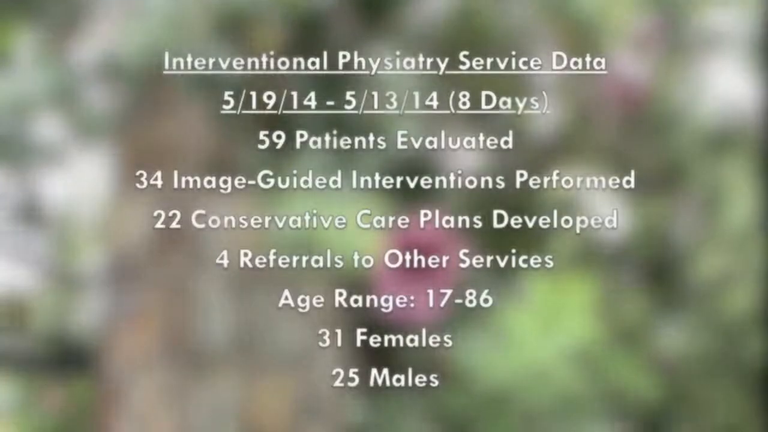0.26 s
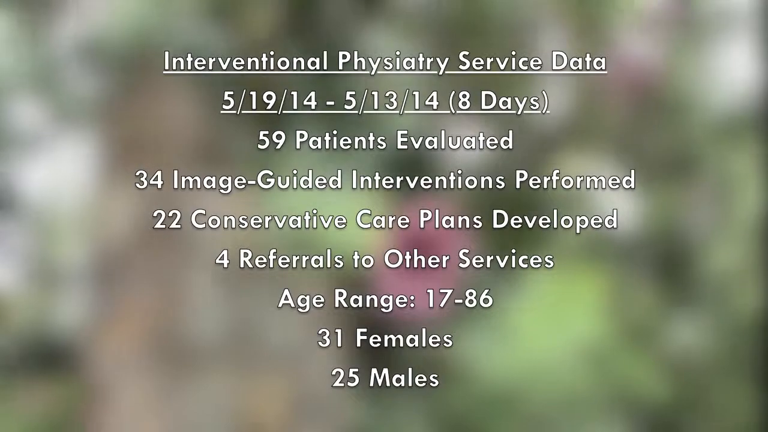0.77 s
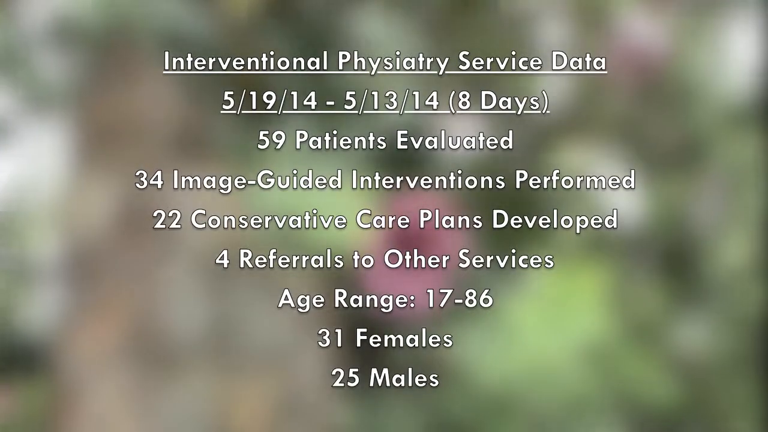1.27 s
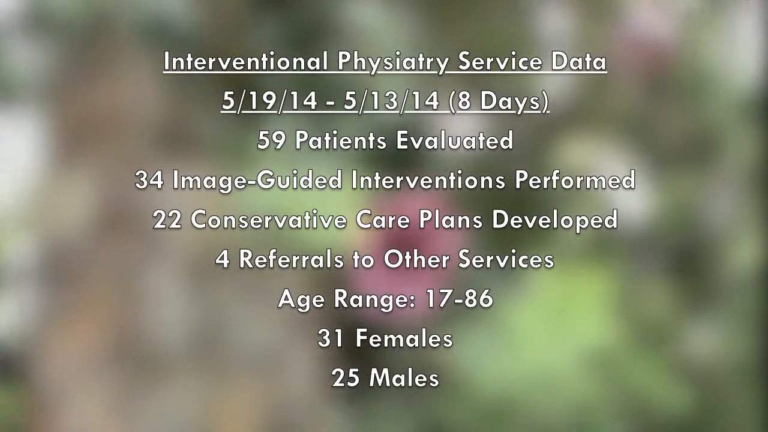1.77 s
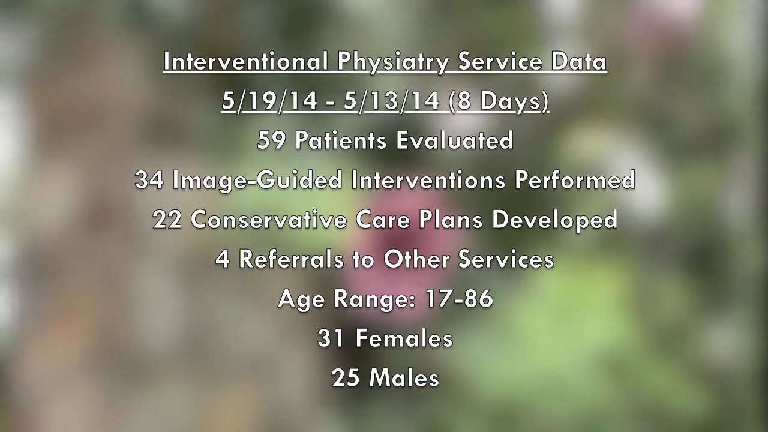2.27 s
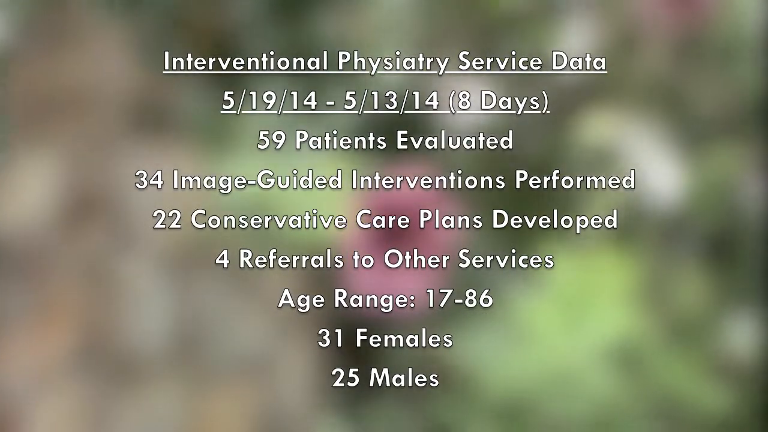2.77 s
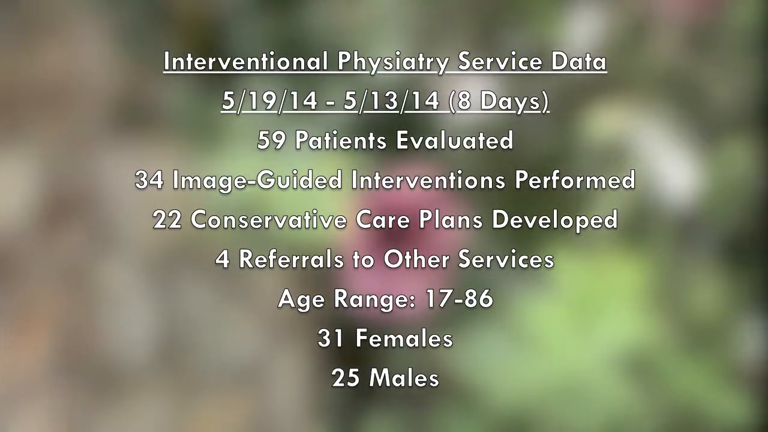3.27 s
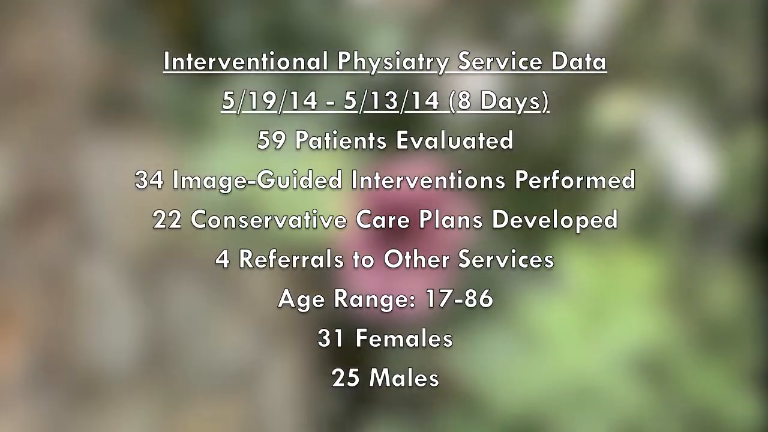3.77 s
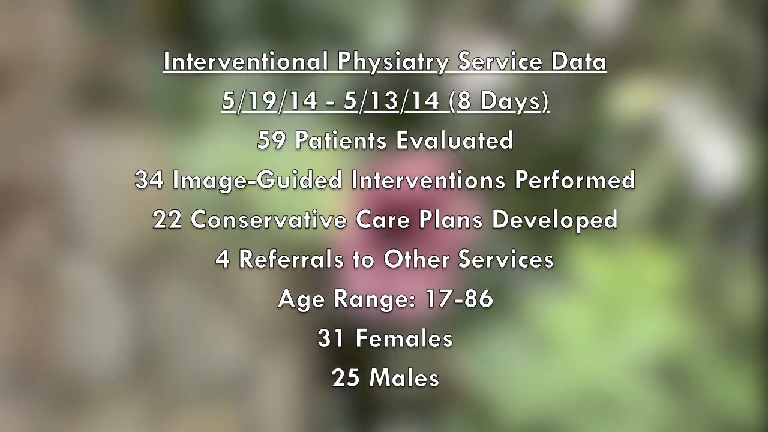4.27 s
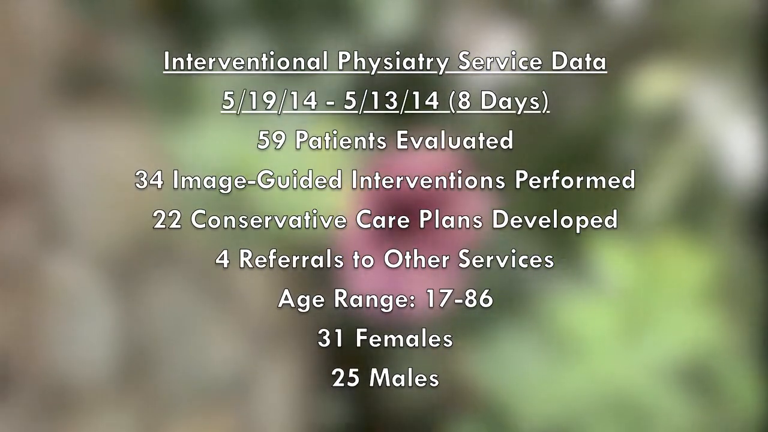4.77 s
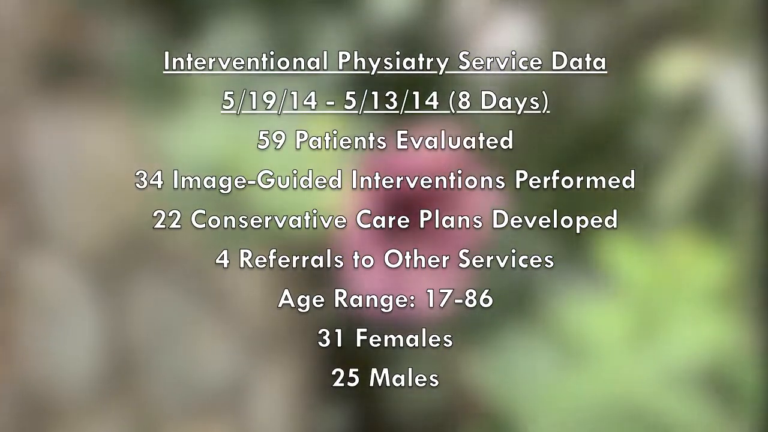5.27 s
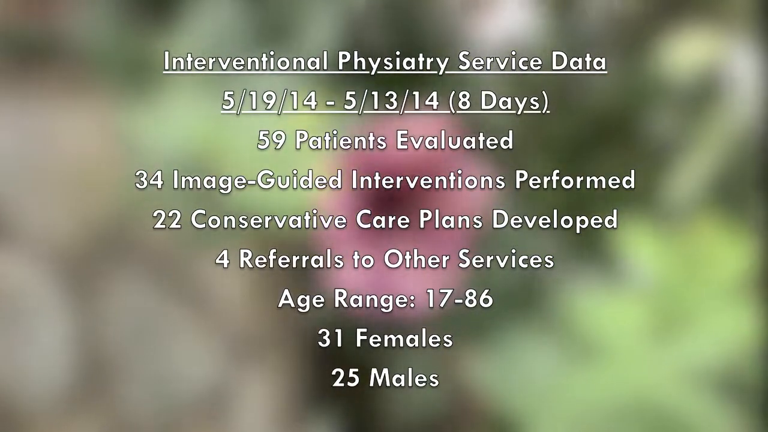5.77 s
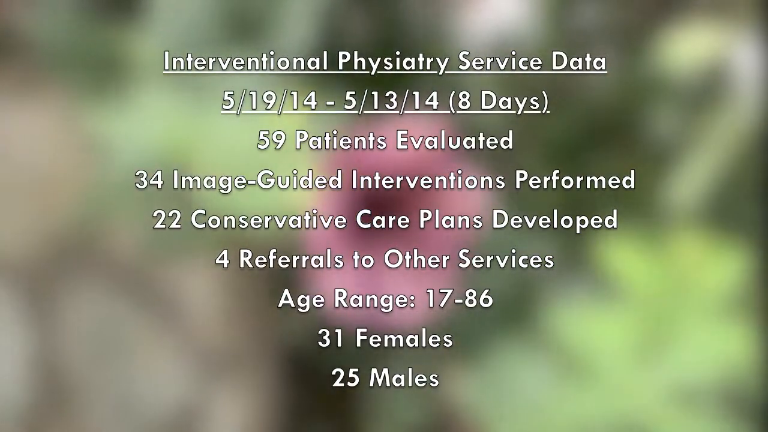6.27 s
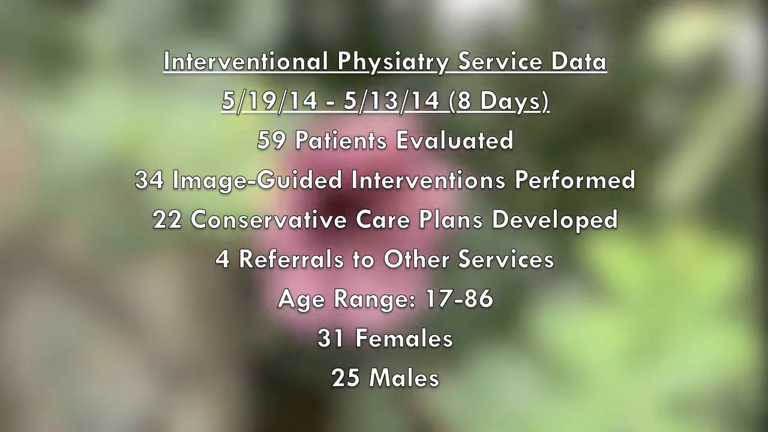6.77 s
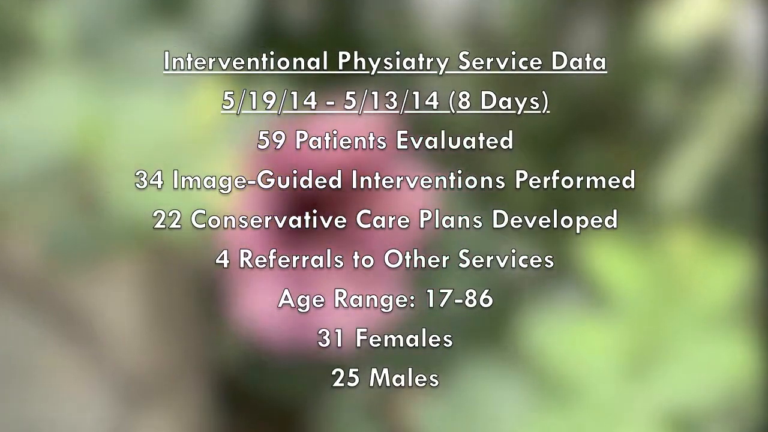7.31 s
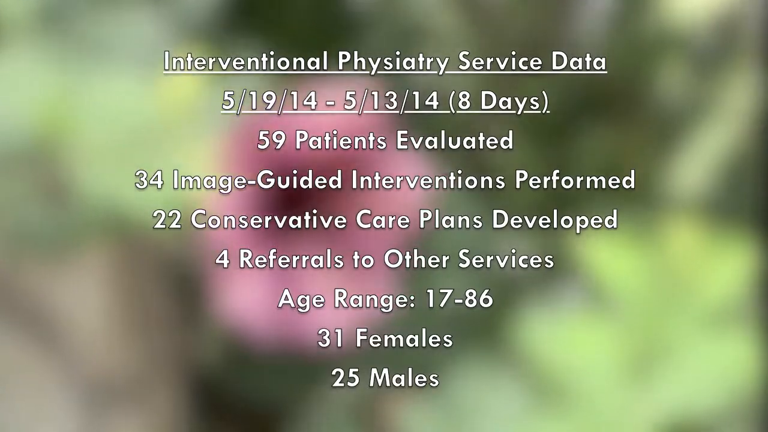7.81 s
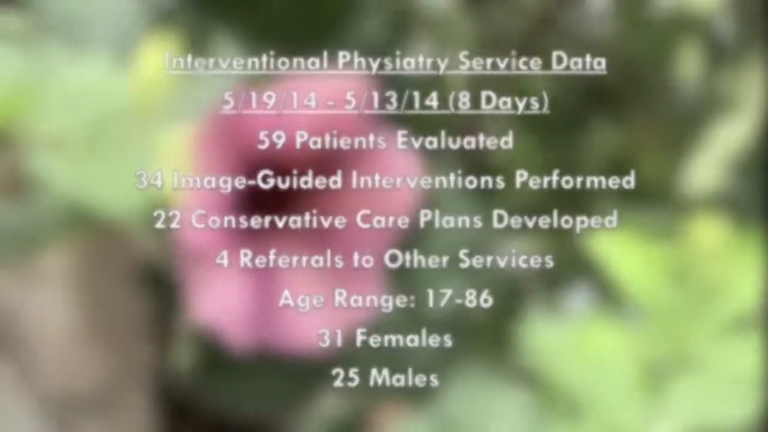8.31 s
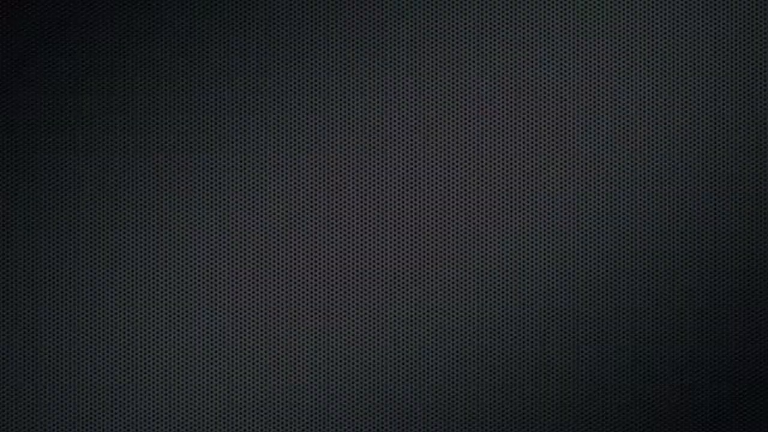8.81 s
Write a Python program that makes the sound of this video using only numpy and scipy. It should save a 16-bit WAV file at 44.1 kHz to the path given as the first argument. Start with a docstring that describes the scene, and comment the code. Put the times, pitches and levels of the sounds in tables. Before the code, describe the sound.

Continuous insect hiss, strongest around five to nine kilohertz, leans slightly left in a wide outdoor stereo field. Over it runs an even, high cricket tone in short rising double pulses with a leafy tail. Far traffic-like murmur and faint microphone hiss stay low. Occasional brushing crackles and tiny taps sound close by, then two sharp clicks, a third just at the end, and sudden silence.

```python
"""A far chorus of cicadas fuses dense tymbal clicks into a bright hiss in a summer garden; a katydid's rasp
throbs in its top band. Cricket chirps of mostly two main rising pulses, with fainter pulses around them, ring
on among the leaves. A dull outdoor murmur and a thin amplifier hiss are coloured noise. Close by are brief
crackling rustles, taps of a few cycles and three dry clicks that snap, then ring; a quick fade ends it."""
import sys
import numpy as np
from scipy import signal
from scipy.fft import rfft, irfft
from scipy.io import wavfile
from scipy.ndimage import uniform_filter1d

SR = 44100
rng = np.random.default_rng(int(sys.argv[2]) if len(sys.argv) > 2 else 0)


def put_to_file(sound):
    """Save the sound as 16-bit audio at rate SR, in the file named by the first command-line argument."""
    columns = np.atleast_2d(sound).T  # one column per channel
    safe = np.clip(columns, -1, 1)
    whole_steps = np.round(safe * 32767)
    wavfile.write(sys.argv[1], SR, whole_steps.astype(np.int16))


N = 399105
TIME = np.arange(N) / SR
FREQ = np.maximum(np.arange(N // 2 + 1) * SR / N, 1)


def undb(db):
    """Gain of a dB value."""
    return 10 ** (np.asarray(db) / 20)


def level(x, rms_db):
    """Scale to an rms level."""
    return x * undb(rms_db) / np.sqrt(np.mean(x ** 2))


def along_hz(table):
    """Columns of a (Hz, ..) table at every frequency bin, interpolated over log frequency."""
    hz, *columns = np.transpose(table)
    return [np.interp(np.log(FREQ), np.log(hz), c) for c in columns]


def split_bands(centres_hz):
    """Power weights of neighbouring bands that crossfade over log frequency and sum to one."""
    return [np.interp(np.log(FREQ), np.log(centres_hz), row) for row in np.eye(len(centres_hz))]


def walk(rate_hz):
    """Random levels, each held 1 / rate_hz, smoothed by two moving means; spread near 1."""
    hold = int(SR / rate_hz)
    steps = np.repeat(rng.standard_normal(N // hold + 1), hold)
    return 1.52 * uniform_filter1d(uniform_filter1d(steps, hold), hold)[:N]


def crowd(share, scatter_db, size=N):
    """Three unrelated streams of clicks; share = part of the samples that hold one."""
    hit = rng.random((3, size)) < share
    strength = undb(scatter_db * rng.standard_normal((3, size)))
    return hit * rng.standard_normal((3, size)) * strength


def spread(streams, gain, place):
    """Colour three streams and place them: one feeds both channels, the others one each."""
    pan_db, lead_rad, likeness = along_hz(place)
    both, left, right = rfft(streams)
    turn = np.exp(.5j * lead_rad)
    shared, own = np.sqrt(likeness) * both, np.sqrt(1 - likeness)
    pair = np.array([(shared * turn + own * left) * undb(pan_db / 2),
                     (shared / turn + own * right) / undb(pan_db / 2)])
    return irfft(pair * gain, N)


def add(out, start_s, sound, pan_db):
    """Mix a short sound in at start_s; pan_db = left minus right."""
    i = int(start_s * SR)
    out[:, i:i + sound.shape[-1]] += sound * undb(np.array([[pan_db], [-pan_db]]) / 2)


# Chorus spectrum. Each row: frequency in Hz, relative density in dB per Hz.
CHORUS_SPECTRUM = [(3300, -37), (4110, -20), (4610, -7.5), (4950, -0.5), (5220, -1.5), (5600, -6),
                   (6000, -1.5), (6400, 0), (7050, -3), (7300, -2), (7850, -4.5), (8600, -1.5),
                   (9100, -6.5), (9700, -14.5), (10250, -45.5), (10800, -78.5)]
# Chorus swell. Each row: time in seconds, rms level in dB.
CHORUS_SWELL = [(0.0, -36.5), (0.65, -35), (7.39, -35), (7.75, -35), (8.7, -35)]
# Stereo place of chorus and katydid. Each row: frequency in Hz, left minus right in dB,
# phase lead of left in radians, likeness of the channels 0-1.
CHORUS_PLACE = [(4000, -2, 0.35, 0.6), (5100, -2.5, .3, 0.89), (6500, -2, .12, 0.94),
                (8000, -1.5, -.04, 0.89), (10200, 0.5, -.04, 0.97)]


def cicadas():
    """Dense tymbal clicks fuse into noise; each species' band wavers a little by itself."""
    colour, out = undb(along_hz(CHORUS_SPECTRUM)[0]), 0
    for band in split_bands([4800, 6400, 8600]):
        waver = undb(.5 * walk(3.545) + 0.34 * walk(25))
        clicks = crowd(.7, 0.83)
        out = out + waver * spread(clicks, colour * np.sqrt(band), CHORUS_PLACE)
    return level(out, 0) * undb(np.interp(TIME, *np.transpose(CHORUS_SWELL)))


# Katydid hesitations, the beat's phase stands still. Each row: start in seconds, length in seconds.
KATYDID_PAUSES = [(2.0, .032), (7.0, .036)]
KATYDID_HZ, KATYDID_SIGMA_HZ, KATYDID_RMS_DB, KATYDID_BEAT_HZ = 8600, 300, -47.5, 11.9
MIRROR_HZ, MIRROR_HALF_WIDTH_HZ, MIRROR_OVER_RASP_DB = 8735, 30, 7


def katydid():
    """A rasp over file teeth, swelling once per wing beat; the wing mirror rings inside its band."""
    paused_s = sum(np.clip(TIME - s, 0, length_s) for s, length_s in KATYDID_PAUSES)
    phase = KATYDID_BEAT_HZ * (TIME - paused_s) % 1
    throb = np.exp(-phase / 0.68) * np.minimum(phase / 0.12, 1)
    rasp = np.exp(-.5 * ((FREQ - KATYDID_HZ) / KATYDID_SIGMA_HZ) ** 2)
    detune = (FREQ - MIRROR_HZ) / MIRROR_HALF_WIDTH_HZ
    mirror = undb(MIRROR_OVER_RASP_DB) / (1 + detune ** 2)
    teeth = throb * crowd(.7, .8)
    return level(spread(teeth, rasp * (1 + mirror), CHORUS_PLACE), KATYDID_RMS_DB)


# Murmur spectrum. Each row: frequency in Hz, relative density in dB per Hz.
MURMUR_SPECTRUM = [(22, -17), (52, -11), (66, -1), (81, -10.5), (96, -3), (115, -8), (178, -8.5),
                   (400, -6.5), (971, -7.5), (1500, -10.5), (2500, -11.5), (4200, -13.5), (6000, -59.5)]
# Stereo place of the murmur. Each row: frequency in Hz, left minus right in dB,
# phase lead of left in radians, likeness of the channels 0-1.
MURMUR_PLACE = [(50, .2, 0.18, 0.98), (100, .4, 0.049, 1), (150, 0.5, 0.18, 0.78), (402, 0.2, 0.72, 0.37),
                (1200, 0.2, 1, 0.2), (2100, 0, 0.57, 0.38), (3300, -.7, 0.79, .65)]
# Low drones. Each row: time in seconds, relative level near 66 Hz in dB, relative level near 97 Hz in dB.
DRONE_LEVELS = [(0, 0, 6), (.25, 2.5, 2.5), (.5, 0.5, 4), (.8, -4, -4.5), (1.1, 6, -0.5), (1.5, -2.5, -2.5),
                (2.3, 3, -1.5), (2.8, -1.5, -3.5), (3.3, -1.5, 1), (3.8, -3.5, -3), (4.2, 4, -4), (5, 0, 2),
                (5.9, 2, -2.5), (6.5, -3, -1), (7.05, 2.5, 5), (7.3, 0.5, 1), (7.65, -2.5, 6.5),
                (8.1, 0.5, 0), (8.5, 1, 3.5), (8.7, -0.5, -2.5)]
MURMUR_RMS_DB = -53.5


def murmur():
    """Far traffic and stirring leaves as noise; two low drones, middle and top swell on their own."""
    colour, out = undb(along_hz(MURMUR_SPECTRUM)[0]), 0
    drone_s, *drones_db = np.transpose(DRONE_LEVELS)
    for k, band in enumerate(split_bands([66, 97, 150, 400, 1800])):
        swell_db = 0.35 * walk(1.5) + 0.89 * walk(7)
        if k < 2:
            swell_db = swell_db + np.interp(TIME, drone_s, drones_db[k])
        grains = crowd(.2, 2.27)
        out = out + undb(swell_db) * spread(grains, colour * np.sqrt(band), MURMUR_PLACE)
    return level(out, MURMUR_RMS_DB)


# Amplifier hiss spectrum. Each row: frequency in Hz, relative density in dB per Hz.
HISS_SPECTRUM = [(10500, -35), (12000, -15.5), (13100, 4), (14900, 7), (15700, 6.5)]
HISS_RMS_DB = -62  # ahead of fade and top cut


def hiss():
    """Amplifier noise above 9 kHz, the same in both channels, flickering."""
    gain = undb(along_hz(HISS_SPECTRUM)[0]) * (FREQ > 9000)
    noise = irfft(rfft(rng.standard_normal(N)) * gain, N)
    return level(noise * undb(1.1 * walk(12.0)), HISS_RMS_DB)


# Cricket chirps. Each row: nominal time of the middle pulse in seconds, its mid pitch in Hz,
# levels in dB at five successive pulse slots (the outer ones often faint),
# tail level in dB ahead of the echo shares.
CHIRPS = [(0.093, 2905, -70, -54, -50, -57, -70, -59), (0.167, 2889, -70, -52, -46, -58, -70, -60),
          (0.27, 2894, -70, -58, -45, -61, -70, -58), (0.374, 2898, -59, -53, -49, -54, -59, -57),
          (0.498, 2894, -70, -50, -45, -55, -70, -57), (0.584, 2890, -58, -54, -42, -55, -60, -57),
          (0.679, 2896, -57, -50, -48, -56, -70, -57), (0.76, 2898, -54, -51, -41, -60, -59, -57),
          (0.856, 2902, -56, -48, -47, -61, -59, -57), (0.978, 2903, -57, -50, -47, -53, -60, -60),
          (1.126, 2894, -70, -49, -46, -61, -70, -59), (1.241, 2905, -55, -52, -46, -58, -63, -59),
          (1.398, 2892, -63, -51, -49, -56, -61, -58), (1.489, 2888, -70, -50, -44, -61, -63, -57),
          (1.584, 2895, -53, -49, -44, -58, -70, -57), (1.675, 2895, -58, -48, -50, -54, -60, -59),
          (1.844, 2888, -70, -50, -46, -54, -70, -57), (1.944, 2893, -50, -48, -49, -59, -60, -59),
          (2.066, 2888, -70, -50, -45, -61, -55, -60), (2.237, 2905, -70, -49, -44, -64, -59, -60),
          (2.322, 2889, -70, -49, -46, -58, -61, -58), (2.454, 2895, -55, -50, -46, -54, -58, -59),
          (2.541, 2881, -62, -56, -49, -59, -60, -59), (2.693, 2902, -59, -50, -44, -70, -70, -57),
          (2.84, 2896, -57, -50, -46, -60, -63, -60), (2.949, 2893, -70, -49, -46, -57, -64, -60),
          (3.109, 2901, -70, -51, -49, -55, -57, -57), (3.238, 2890, -70, -49, -47, -57, -55, -60),
          (3.383, 2904, -58, -51, -45, -61, -61, -59), (3.525, 2888, -70, -54, -52, -60, -56, -60),
          (3.662, 2893, -70, -51, -47, -70, -60, -60), (3.812, 2904, -70, -54, -49, -59, -55, -59),
          (3.967, 2889, -70, -53, -49, -55, -70, -59), (4.055, 2908, -61, -54, -46, -57, -70, -60),
          (4.223, 2902, -64, -50, -46, -60, -58, -60), (4.344, 2905, -61, -50, -49, -70, -56, -58),
          (4.466, 2908, -70, -53, -53, -56, -58, -59), (4.611, 2907, -54, -49, -53, -56, -70, -60),
          (4.681, 2919, -70, -61, -51, -70, -70, -60), (4.836, 2911, -70, -55, -50, -60, -61, -60),
          (4.995, 2909, -70, -58, -51, -63, -61, -57), (5.09, 2901, -56, -49, -50, -58, -58, -57),
          (5.186, 2898, -51, -52, -51, -58, -70, -60), (5.293, 2905, -59, -48, -50, -54, -60, -59),
          (5.41, 2891, -70, -52, -51, -62, -57, -59), (5.579, 2910, -56, -48, -49, -55, -62, -60),
          (5.687, 2894, -70, -55, -48, -58, -54, -57), (5.856, 2898, -53, -50, -47, -51, -58, -58),
          (6.002, 2905, -52, -48, -49, -52, -57, -59), (6.164, 2911, -50, -47, -49, -60, -60, -57),
          (6.307, 2905, -49, -52, -48, -59, -70, -60), (6.441, 2891, -61, -57, -49, -59, -62, -60),
          (6.598, 2910, -70, -57, -48, -70, -54, -60), (6.744, 2896, -64, -52, -51, -55, -60, -60),
          (6.914, 2894, -70, -54, -51, -55, -56, -60), (7.039, 2891, -70, -54, -44, -52, -57, -60),
          (7.216, 2900, -70, -49, -44, -60, -64, -60), (7.368, 2896, -70, -47, -45, -60, -70, -57),
          (7.44, 2905, -62, -46, -44, -59, -70, -60), (7.574, 2900, -70, -46, -47, -60, -61, -60),
          (7.727, 2895, -70, -48, -43, -58, -55, -60), (7.871, 2890, -70, -47, -43, -58, -55, -60),
          (8.034, 2904, -70, -49, -46, -59, -58, -58), (8.186, 2911, -70, -48, -46, -64, -64, -57),
          (8.537, 2897, -70, -50, -45, -70, -70, -60)]
PULSE_SPAN_S, PULSE_GAP_S = 1.76 * .0135, .0174
PULSE_RISE_HZ, PULSE_STEP_HZ = 95, 20  # within a pulse; from one slot to the next
CRICKET_PAN_DB, PAN_SCATTER_DB = -2, 1.0
LEAVES_T60_S, LEAVES_SHARE, LEAVES_DELAY_S = 0.6, 2.3, .02
WALL_DELAY_S, WALL_SHARE = .0123, 1.5
TAIL_LIFT_HZ = 15


def leaf_decay():
    """Envelope of scattering among leaves: a delayed onset, an exponential decay, set energy."""
    t = TIME[:SR // 3]
    decay = undb(-60 * t / LEAVES_T60_S) * np.clip((t - LEAVES_DELAY_S) / 0.034, 0, 1)
    return decay * LEAVES_SHARE / np.sqrt(np.sum(decay ** 2))


def chirp_pulses(hz, slots_db, gap):
    """Rising tone pulses, main and faint, gap samples apart, each with the same phase at its middle."""
    u = np.linspace(-.5, .5, int(PULSE_SPAN_S * SR))
    shape = np.cos(np.pi * u) ** 1.73
    chirp = 0
    for k, db in enumerate(slots_db):
        cycles = np.cumsum(hz + PULSE_STEP_HZ * (k - 2) + PULSE_RISE_HZ * u) / SR
        tone = shape * np.sin(2 * np.pi * (cycles - cycles[len(u) // 2]))
        chirp = chirp + undb(db) * np.pad(tone, (k * gap, (4 - k) * gap))
    return chirp


def cricket():
    """Chirps arrive direct, off one near surface and scattered by leaves into a tail."""
    out, decay = np.zeros((2, N)), leaf_decay()
    for middle_s, hz, *slots_db, tail_db in CHIRPS:
        gap_scatter, pan_scatter = rng.standard_normal(2)
        pan_db = CRICKET_PAN_DB + PAN_SCATTER_DB * pan_scatter
        # the wing's timing differs by a few samples each time
        chirp = chirp_pulses(hz, slots_db, int(PULSE_GAP_S * SR + 2.4 * gap_scatter))
        start_s = middle_s - 2 * PULSE_GAP_S - int(PULSE_SPAN_S * SR) / SR / 2
        add(out, start_s, chirp, pan_db)
        echo = undb(tail_db - max(slots_db))
        add(out, start_s + WALL_DELAY_S, WALL_SHARE * echo * chirp, pan_db)
        shared, left, right = rng.standard_normal((3, len(decay))) * decay * echo
        echoes = 0.71 * shared + 0.77 * np.array([left, right])
        # the tail sounds a little higher than the pulses
        shift = np.exp(2j * np.pi * TAIL_LIFT_HZ * TIME[:len(chirp)])
        lifted = np.real(signal.hilbert(chirp) * shift)
        add(out, start_s, signal.fftconvolve(lifted[None], echoes, axes=1), pan_db)
    return out


# Rustles. Each row: middle in seconds, length in seconds, rms level in dB ahead of the window, top in Hz.
RUSTLES = [(0.253, 0.047, -56, 597), (1.496, 0.078, -56.5, 1500), (1.546, 0.03, -51, 2200),
           (2.028, 0.1, -54, 700), (2.113, 0.047, -52.5, 2000), (3.297, 0.27, -58.5, 1200),
           (3.804, 0.054, -51, 1500), (4.432, 0.076, -57, 1800), (4.943, 0.0384, -56.5, 350),
           (6.03, 0.047, -52, 1000), (6.146, 0.14, -55.5, 1400), (6.744, 0.23, -57, 1200),
           (8.038, 0.11, -54, 1300)]


def rustles():
    """Short dull crackles of something brushed close by: sparse band-limited clicks."""
    out = np.zeros((2, N))
    for middle_s, length_s, rms_db, top_hz in RUSTLES:
        shared, left, right = crowd(0.066, 3.6, size=SR // 2)[:, :int(length_s * SR)]
        sos = signal.butter(3, (90, top_hz), "bandpass", fs=SR, output="sos")
        grains = signal.sosfilt(sos, shared + 0.39 * np.array([left, right]))
        add(out, middle_s - length_s / 2, level(grains, rms_db) * np.hanning(grains.shape[1]), 0)
    return out


# Soft taps. Each row: start in seconds, envelope peak in dB, pitch in Hz, left minus right in dB.
TAPS = [(2.011, -58, 248, 2), (2.04, -50, 228, -1), (2.114, -51, 930, -4), (2.12, -42.5, 970, -4),
        (5.202, -50.5, 566, 0), (5.212, -47, 1000, 0), (5.214, -45, 646, 0), (6.011, -46.5, 865, -1),
        (6.017, -48.5, 392, -2), (6.021, -51, 820, -2), (6.034, -49, 308, -2), (6.095, -54, 340, -2),
        (7.993, -51, 353, 1), (8.025, -48, 870, -4), (8.049, -45, 1040, -5.5)]
TAP_CYCLES = 5  # envelope peaks after TAP_CYCLES / e


def taps():
    """A few softly pushed cycles: a sine under a rise-and-decay envelope."""
    out, t = np.zeros((2, N)), TIME[:SR // 20]
    for start_s, peak_db, hz, pan_db in TAPS:
        x = np.e * hz * t / TAP_CYCLES
        push = x * np.exp(1 - x)
        add(out, start_s, undb(peak_db) * np.sin(2 * np.pi * hz * t) * push, pan_db)
    return out


# Dry clicks. Each row: snap peak in seconds, level in dB.
CLICKS = [(8.2573, -28), (8.3991, -31), (8.7184, -30)]
# Shell modes. Each row: frequency in Hz, level relative to the click in dB, t60 in seconds.
SHELL_MODES = [(950, -9, 0.013), (1400, -8, 0.015), (1930, 1, 0.011), (2150, -12.5, .008), (2570, -9, .008),
               (3300, -7, 0.0074), (3850, -11, 0.0065)]
SNAP_HZ, SNAP_SIGMA_S, SNAP_LEAD_S = 2200, .00017, .001
RING_DELAY_S, RING_RISE_S = 0.00058, .0005


def clicks():
    """A snap of about one cycle, then the decaying modes of a small shell."""
    out, t = np.zeros((2, N)), TIME[:SR // 20]
    after_s = t - SNAP_LEAD_S
    window = np.exp(-.5 * ((after_s + 0.41 * SNAP_SIGMA_S) / SNAP_SIGMA_S) ** 2)
    snap = window * np.cos(2 * np.pi * SNAP_HZ * after_s)
    ring = sum(undb(db - 60 * t / t60_s) * np.sin(2 * np.pi * hz * t) for hz, db, t60_s in SHELL_MODES)
    ring *= 1 - np.exp(-(t / RING_RISE_S) ** 2)
    for peak_s, db in CLICKS:
        add(out, peak_s - SNAP_LEAD_S, undb(db) * snap, -.3)
        add(out, peak_s + RING_DELAY_S, undb(db) * ring, -.3)
    return out


def scene():
    """Sum of all sources in two channels."""
    return cicadas() + katydid() + murmur() + cricket() + rustles() + taps() + clicks()


# Closing fade: start in seconds, end in seconds.
FADE_S = (8.687, 8.796)
TOP_HZ = 15750


def record(dry):
    """Add amplifier hiss, fade straight to silence, cut the top steeply."""
    faded = (dry + hiss()) * np.interp(TIME, FADE_S, (1, 0))
    top_cut = signal.ellip(16, .2, 70, TOP_HZ, fs=SR, output="sos")  # ripple dB, stopband dB
    return signal.sosfilt(top_cut, faded)


dry = scene()
out = record(dry)
put_to_file(out)
```